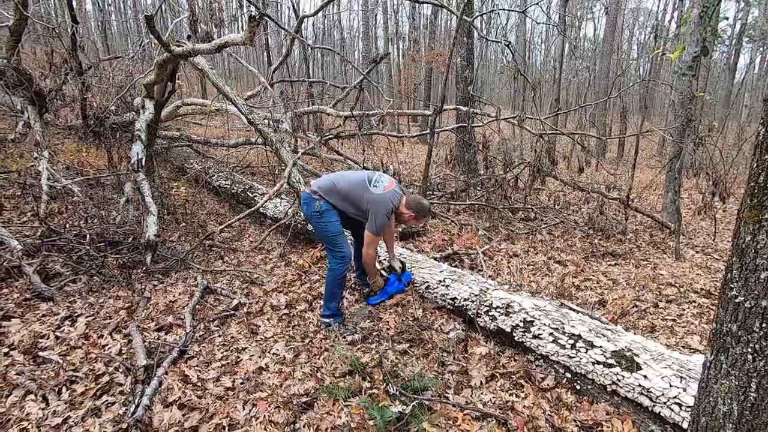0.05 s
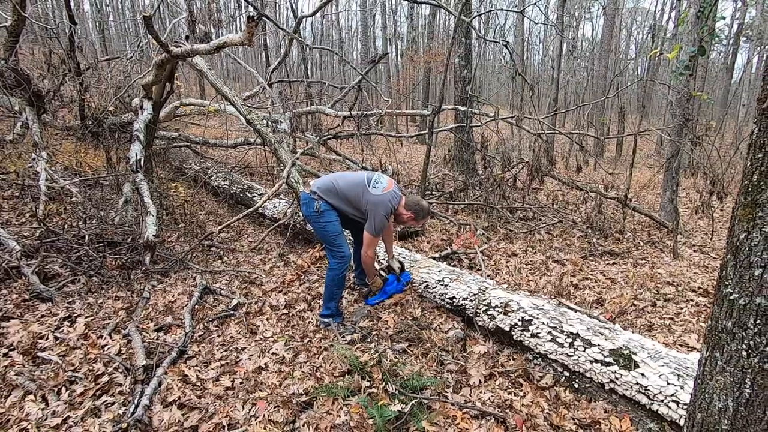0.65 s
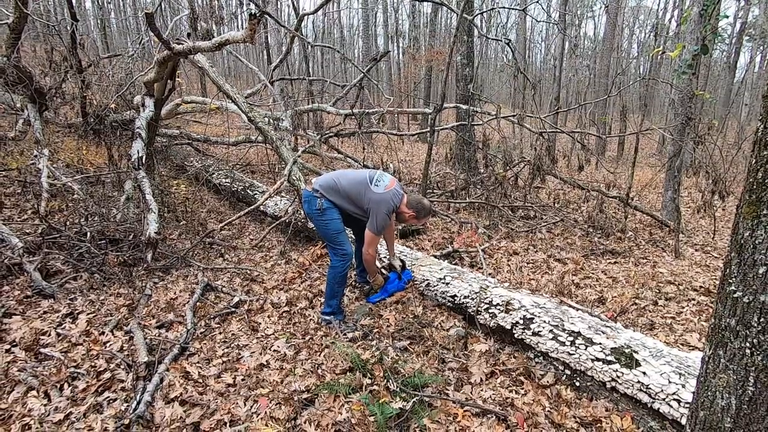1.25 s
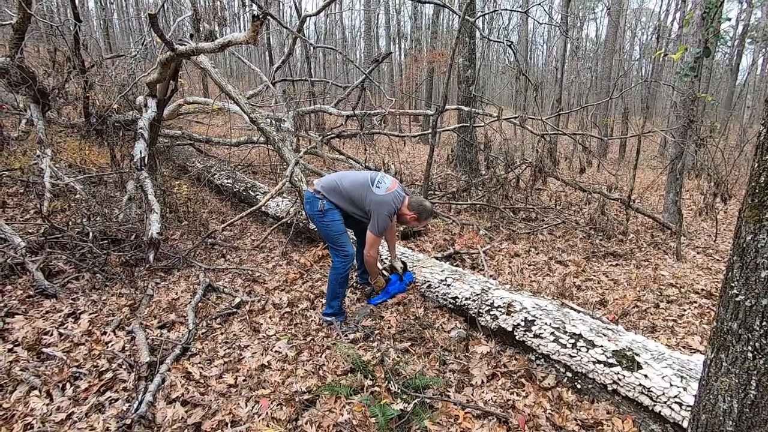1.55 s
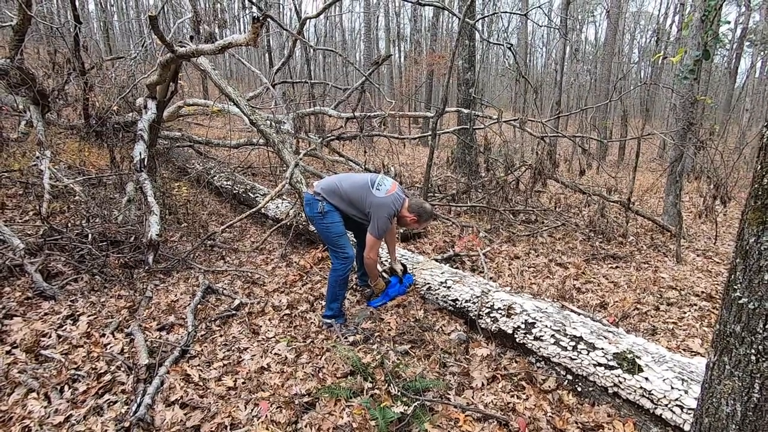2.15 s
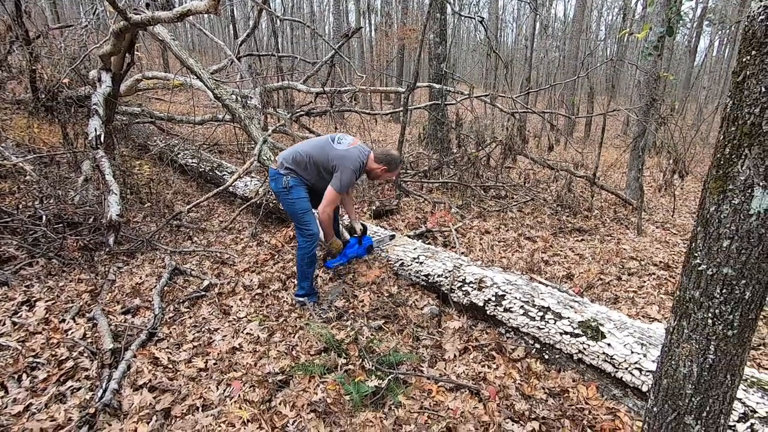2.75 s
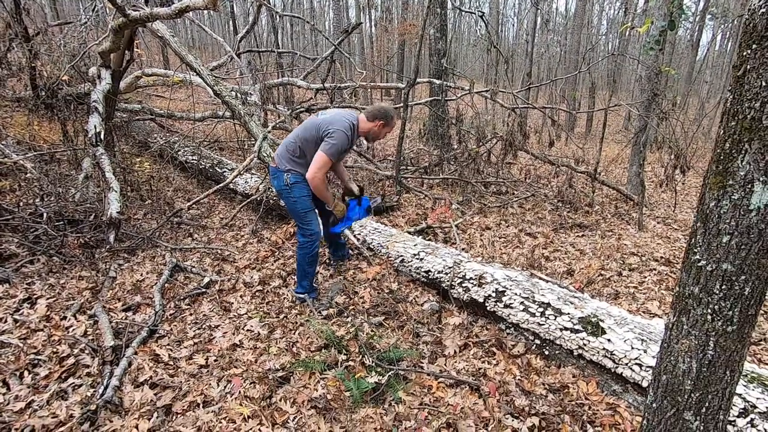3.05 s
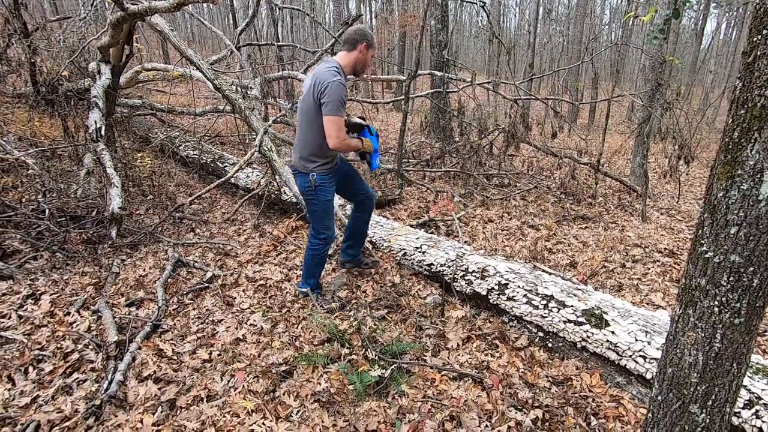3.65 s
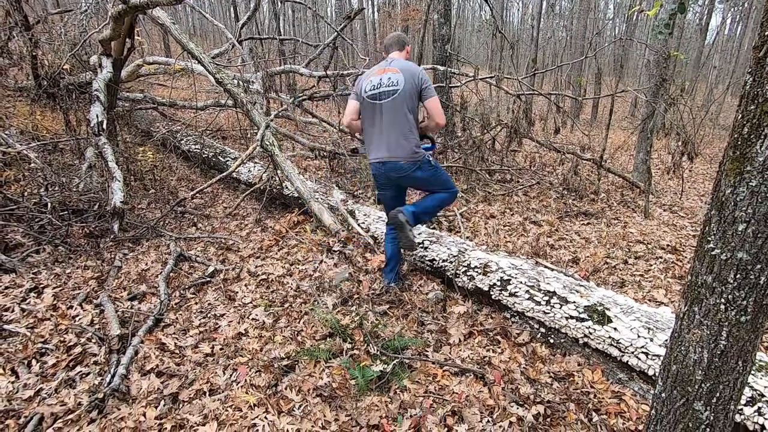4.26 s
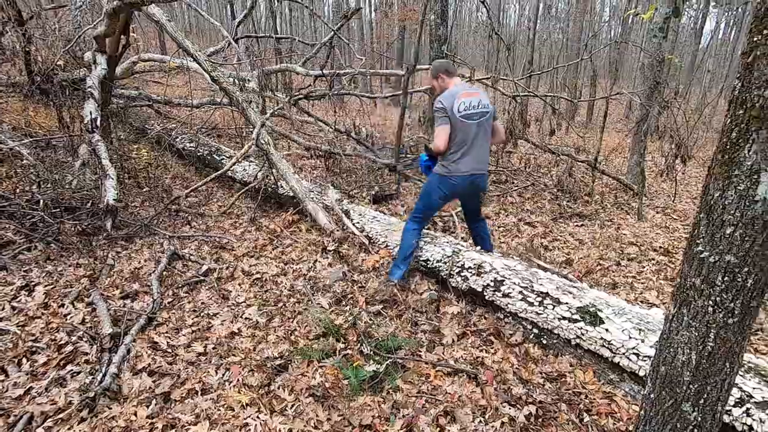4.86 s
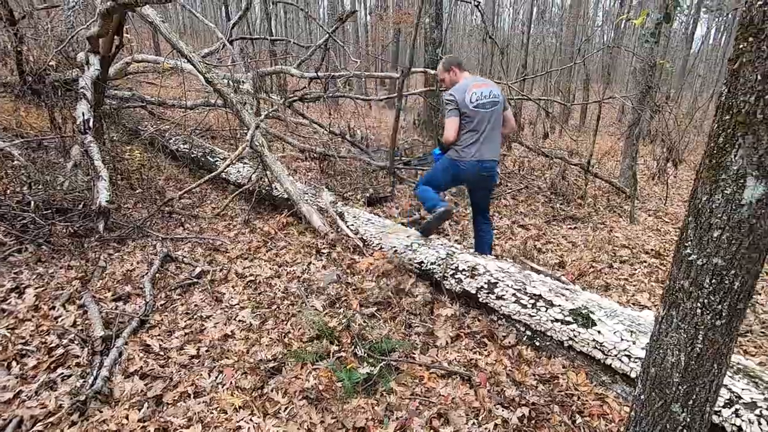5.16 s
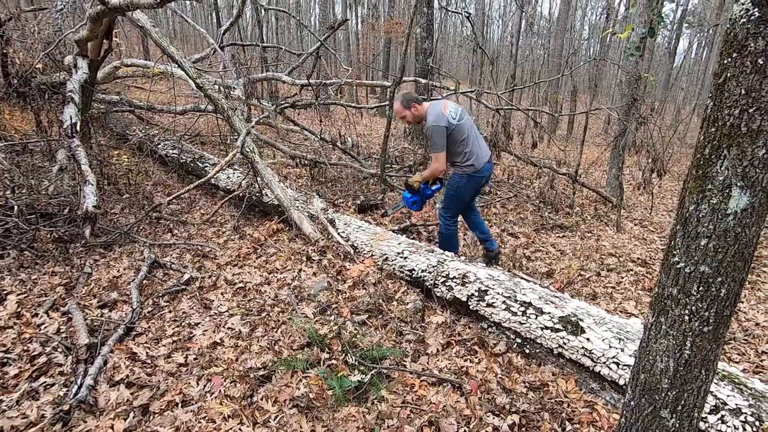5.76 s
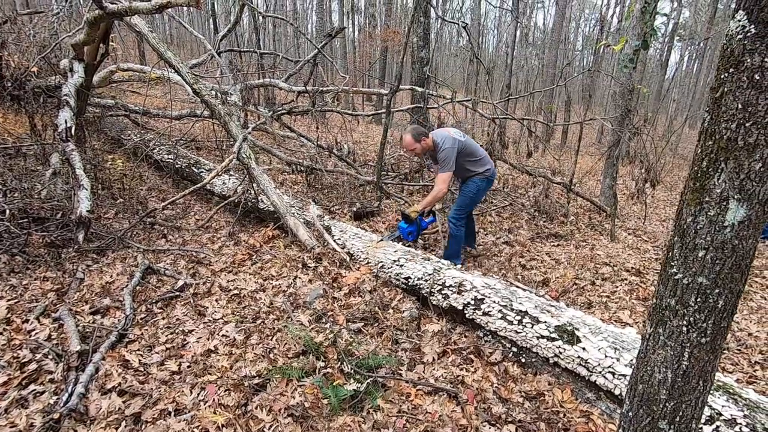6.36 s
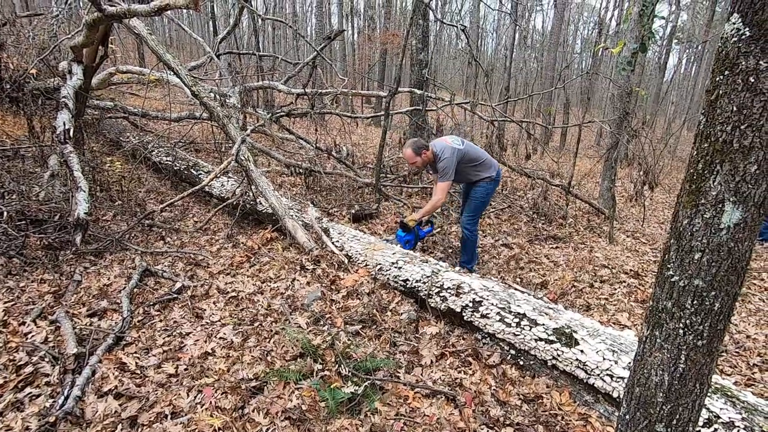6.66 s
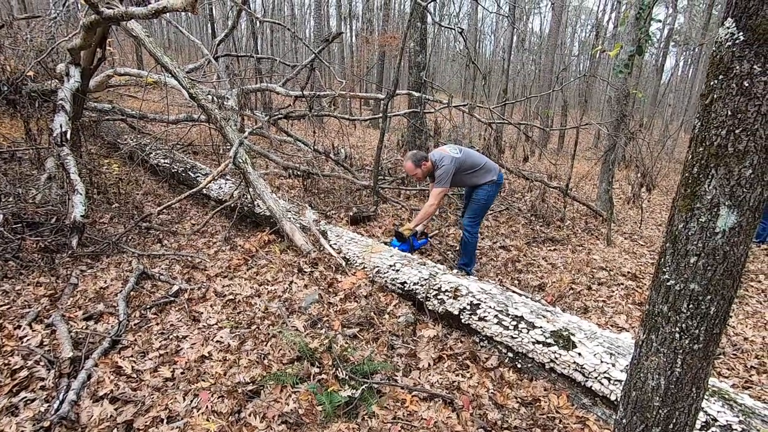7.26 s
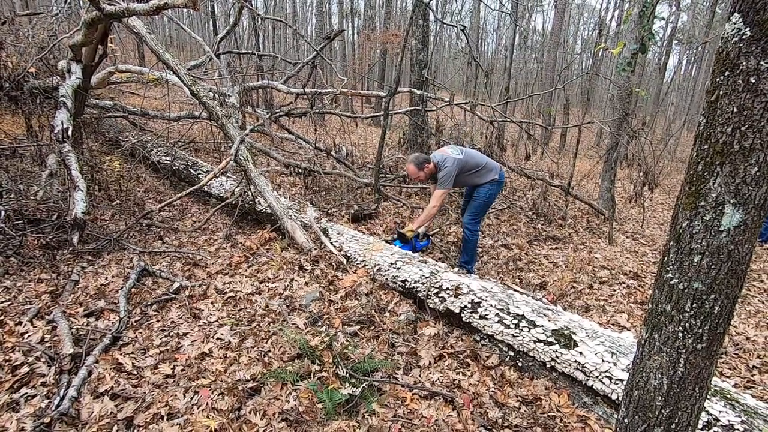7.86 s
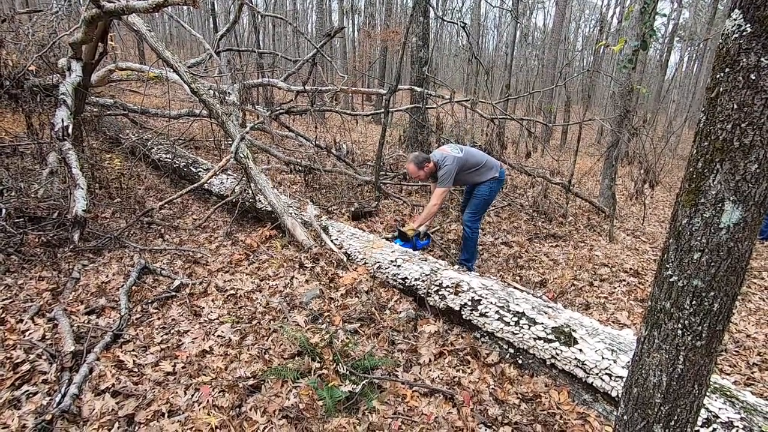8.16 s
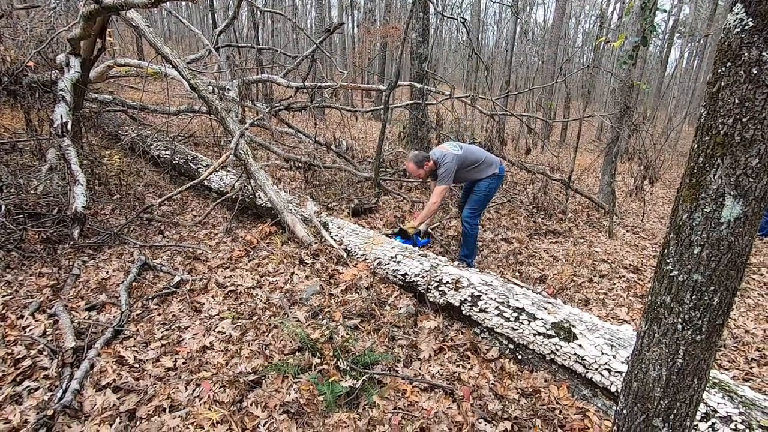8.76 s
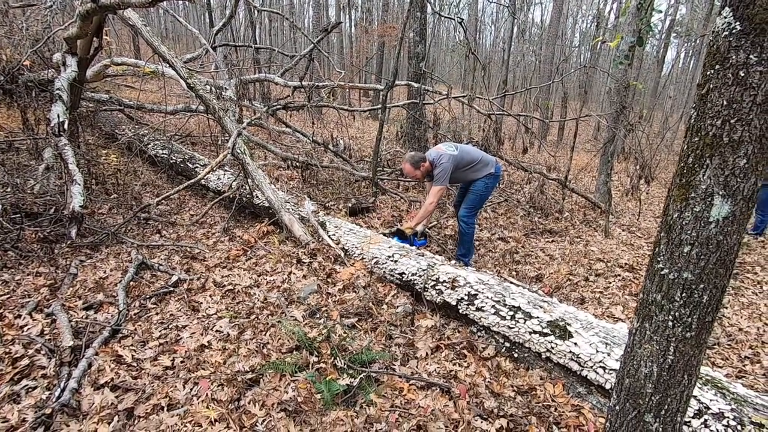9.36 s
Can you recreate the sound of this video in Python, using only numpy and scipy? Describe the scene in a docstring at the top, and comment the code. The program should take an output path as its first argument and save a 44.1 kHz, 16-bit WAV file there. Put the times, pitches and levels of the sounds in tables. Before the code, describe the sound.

A battery chainsaw bites into a fallen log a few metres away, its buzzing whine throbbing and wavering with the load. The chain races free, rattles and winds down. Footsteps crunch through dry leaves, with twigs snapping underfoot. Then the saw spins up again, skates on the bark and drops in pitch as it sinks into a steady second cut. The forest around is quiet, with only a faint short echo.

```python
"""Battery chainsaw in a winter wood.

A few metres away the chain throbs as it bites a fallen log, races free and stops. The sawyer steps over
the log through dry leaves and twigs, spins the saw up on the far side and leans it into the cut again.
Drive links rattle round the bar and sprocket; a cutter on every second link strikes the wood."""
import sys
import numpy as np
from scipy import signal
from scipy.fft import rfft, irfft, next_fast_len
from scipy.io import wavfile
from scipy.ndimage import uniform_filter1d

SR = 44100
rng = np.random.default_rng(int(sys.argv[2]) if len(sys.argv) > 2 else 0)


def dump(signal):
    """Clip the signal to [-1, 1] and save it as 16-bit WAV at the path in sys.argv[1]."""
    limited = np.clip(np.atleast_2d(signal).T, -1, 1)
    pcm = np.round(limited * 32767).astype(np.int16)
    wavfile.write(sys.argv[1], SR, pcm)


N = 414981
T = np.arange(N) / SR
RELEASE_S, TRIGGER_S = 2.62, 6.4  # trigger let go, pulled again
FREE_HZ = 622.7  # link rate with no drag

# Drag of the wood on the chain. Each row: time in seconds, drag (0 free, about 1 buried).
DRAG = [(0, 1.02), (1.1, 0.98), (2.458, .89), (2.48, 0.12), (2.54, 0.012), (6.95, 0.05), (7.31, 0.32),
        (7.42, 0.3), (7.71, 0.37), (7.79, 0.91), (7.95, 0.96), (8.78, 0.96), (8.9, 1.02), (9.03, 1.02),
        (9.16, 0.94), (9.35, 1.05)]


def chainsaw(bite_sag_per_db=.0015, sag_lag_s=.03):
    """Chain noise, sprocket whine and log drone, all following the chain speed."""
    # Cutters digging in. Each row: time in seconds, swell in dB, of which each layer takes a share.
    bites = [(0.062, 11), (0.249, 5.5), (.43, 9.5), (.51, 11), (0.609, 9), (.74, 11), (0.86, 10),
             (.953, 9.5), (1.043, 7.5), (1.129, 16), (1.245, 13.5), (1.396, 14.5), (1.48, 9), (1.575, 10.5),
             (1.72, 12), (1.945, 7.5), (2.17, 8.5), (2.345, 8)]
    # Saw level on each side of the log. Each row: time in seconds, gain in dB.
    near_level = [(0, -28), (2.41, -27.5), (2.74, -24.5), (2.84, -31.5), (2.94, -36.5), (2.975, -61)]
    far_level = [(6.39, -51), (6.44, -35.5), (6.49, -29), (6.619, -28.5), (6.69, -24), (7.35, -22.5),
                 (8.02, -26), (9.41, -27)]
    # Buried saw, near cut then far. Each row: link tone, cutter tone, log drone, in relative dB.
    cuts = [(-11, -18.5, -11), (-18, -32.5, -21.5)]
    link_hz, spin, load, graze = drive()
    t = T[::64]
    bite_db = np.interp(T, t, sum(db * np.exp(-.5 * ((t - s) / .026) ** 2) for s, db in bites))
    near_gain, far_gain = (undb(curve(side)) * during(side) for side in (near_level, far_level))
    link_db, cutter_db, drone_db = (np.where(T < TRIGGER_S, *pair) for pair in zip(*cuts))
    # each bite slows the chain a moment later
    sag = bite_sag_per_db * (np.interp(T - sag_lag_s, T, bite_db) - bite_db)
    links = np.cumsum(link_hz * (1 - sag + (.003 + .013 * load) * wander(45))) / SR
    phase = 2 * np.pi * links + (.7 - .25 * load + 3 * (1 - spin)) * wander(110)
    flutter_db = 2.3 * wander(45)
    link_db = -19.5 * (1 - load) + link_db * load - 2.5 * graze + flutter_db
    whine = sprocket_whine(links, phase, link_db, bite_db, graze) * undb(-24 * (1 - spin))
    drone = log_drone(links) * undb(-24 * (1 - load) + drone_db * load - 2 * (1 - spin))
    cutter_tone = np.sqrt(2) * np.sin(phase / 2 + .5 * wander(70))
    cutter_tone *= load * undb(cutter_db + .7 * bite_db + flutter_db)
    near_rattle, far_rattle = chain_rattle(links, load, graze, slack=1 - link_hz / FREE_HZ)
    near_chips, far_chips = wood_chips(links, load, bite_db)
    gears = gear_whine(links, graze) * (1 - load)
    rasp = chain_rasp(links) * (1 - load)
    near_buzz, far_buzz = cutter_buzz(links, load, bite_db)
    near = (near_rattle + near_chips + near_buzz + rasp) * undb(2.64 * load - .77)
    far = (far_rattle + far_chips + far_buzz + gears) * undb(-1)
    return near * near_gain + far * far_gain + (whine + drone + cutter_tone) * (near_gain + far_gain)


def drive(coast_s=.97, spin_up_s=.49, kick=.15, sag_hz=266, bark_drag=.38, buried_drag=.86):
    """The motor spins the chain, the wood slows it. Returns link rate, then spin, load, graze (0-1)."""
    drag = curve(DRAG)
    coasting = 1 - ramp(T, RELEASE_S, coast_s)
    starting = kick + (1 - kick) * ramp(T, TRIGGER_S, spin_up_s)
    spin = np.where(T < TRIGGER_S, coasting, starting)
    buried = ramp(drag, bark_drag, buried_drag - bark_drag)
    graze = ramp(drag, 0, .2) * (1 - buried)  # skating on bark
    return spin * (FREE_HZ - sag_hz * drag), spin, .94 * buried, graze


def wood_chips(links, load, bite_db):
    """Cutters chip the wood and ring the pinched guide bar. Returns near, far."""
    # Bar resonances. Each row: centre in Hz, width in Hz, gain in dB.
    near_bar = [(1190, 88, 1), (2950, 210, -13), (4770, 220, -3), (5740, 270, -1), (6520, 230, -5.5),
                (9300, 140, 2)]
    far_bar = [(2476, 43, -1.2), (4460, 99, 2)]
    # Buried spectra. Each row: frequency in Hz, relative level in dB.
    near_spectrum = [(290, -91), (500, -13), (914, 1.5), (1010, -5.5), (1600, -7.5), (1830, -6),
                     (2090, -0.5), (2400, -14), (2700, -6), (3380, -11.5), (4840, -14), (6090, -22.5),
                     (7800, -18), (8720, -33.5), (12100, -35.5), (15500, -53)]
    far_spectrum = [(290, -57), (500, -12), (737, -3), (803, -4.5), (1100, 3.5), (1310, -7.5), (1750, 5.5),
                    (2290, -6), (2500, -2.5), (4020, -6.5), (4440, -9.5), (5350, -12), (7130, -14.5),
                    (12900, -42.5), (15500, -48)]
    chips = impacts(links / 2, scatter_db=1, jitter_turns=.04, grit=2.9, fade_turns=2.8)
    chips *= np.sqrt(load) * undb(.48 * wander(24))
    # a deep bite swells the woody middle; the steel hiss stays even
    biting = chips + (undb(.5 * bite_db - 2) - 1) * ring(chips, 790, 680)
    near = biting + sum(undb(db) * ring(biting, hz, width) for hz, width, db in near_bar)
    far = chips + sum(undb(db) * ring(chips, hz, width) for hz, width, db in far_bar)
    return voiced(near, near_spectrum), voiced(far, far_spectrum)


def cutter_buzz(links, load, bite_db):
    """Harmonics of the cutters striking the wood. Returns near, far."""
    # Each row: multiple of the cutter rate, relative level in dB.
    near_orders = [(3, -24.5), (5, -14), (10, -12.5), (14, -20.5)]
    far_orders = [(4, -15), (6, -14.5)]
    near = wavering(links / 2, near_orders) * undb(.61 * bite_db - 1.5)
    return load * near, load * wavering(links / 2, far_orders)


def chain_rattle(links, load, graze, slack):
    """Free links rattle; a slowing chain slaps the bar; bark damps the hiss. Returns near, far."""
    # Free-running spectra. Each row: frequency in Hz, relative level in dB.
    near_spectrum = [(290, -16), (500, -20), (803, -2.5), (1130, -6), (1310, -10.5), (1820, -3),
                     (2090, -4.5), (2290, -6.5), (3300, -9), (4800, -11.5), (5900, -17.5), (6400, -15),
                     (7000, -16.5), (12100, -31), (15500, -44)]
    far_spectrum = [(290, -52), (340, -9.5), (520, -18), (790, -4), (1100, -2), (1290, -11), (1500, -3.5),
                    (1820, .5), (2240, -8.5), (2650, -4.5), (3700, -5.5), (4050, -10), (5400, -12.5),
                    (7130, -12), (8600, -19.5), (12300, -30), (15500, -45)]
    rattle = impacts(links, scatter_db=1.5, jitter_turns=.08, grit=2.2) * np.sqrt(1 - load)
    slap = undb(6.5) * slack * (1 - load) * (ring(rattle, 800, 160) + ring(rattle, 1760, 220))
    damped = rattle - .56 * graze * ring(rattle, 9990, 12000)
    return voiced(rattle + slap, near_spectrum), voiced(damped, far_spectrum)


def chain_rasp(links):
    """The chain whips out of the cut: bands of scraping that slide with its speed."""
    # Each row: multiple of the link rate, relative level in dB.
    bands = [(6.251, -9), (7.4, -9.5)]
    rasp = np.zeros(N)
    for order, db in bands:
        phase = 2 * np.pi * order * links
        rasp += undb(db) * (wander(520) * np.sin(phase) + wander(520) * np.cos(phase))
    return rasp


def sprocket_whine(links, phase, link_db, bite_db, graze):
    """Link tone and its octave, which rings the casing while the chain skates on bark."""
    tone = undb(link_db + .61 * bite_db) * np.sin(phase)
    octave = undb(2.4 * wander(30)) * np.sin(4 * np.pi * links + .95 * wander(110))
    casing = undb(-8) * graze * ring(octave, 1095, 75)
    return np.sqrt(2) * (tone + undb(-24.5 + .5 * bite_db) * octave + casing)


def log_drone(links):
    """Cutter blows shake the log."""
    # Each row: frequency in Hz, relative level in dB.
    spectrum = [(90, -9), (125, -6), (170, 4.5), (240, 5), (440, 3.5), (560, -16), (800, -31)]
    return unit(colour(impacts(links / 2, scatter_db=2, jitter_turns=.14, grit=5.8), spectrum))


def gear_whine(links, graze, housing_hz=3600, width_hz=730):
    """Gear tones and a high motor order sing as they sweep through housing resonances."""
    # Each row: multiple of the link rate, relative level in dB.
    orders = [(5.85, -17), (6.18, -12.5), (6.7, -11.5)]
    gears = ring(ring(wavering(links, orders), housing_hz, width_hz), housing_hz, width_hz)
    whistle = ring(np.sin(2 * np.pi * 20.4 * links + wander(300)), 11940, 450)
    return undb(5.5 - 6 * graze) * gears + undb(-26) * whistle


def footsteps(cracks_per_s=4000, lone_per_s=70, lone_decay_s=.0013, attack_s=.043, release_s=.065):
    """Dry leaves slide and break in dense tiny cracks under each tread, and stir in between."""
    # Treads and scuffs. Each row: start in seconds, length in seconds, relative level in dB.
    steps = [(3.405, 0.018, -41), (3.539, 0.05, -45), (3.747, .012, -40.5), (3.89, 0.19, -33.5),
             (4.502, 0.034, -42), (4.628, 0.016, -36.5), (4.795, 0.061, -35), (4.978, 0.054, -36.5),
             (5.074, 0.046, -34.5), (5.22, 0.086, -43.5), (5.555, 0.067, -39), (5.83, 0.2, -45),
             (6.063, 0.01, -43.5), (6.179, 0.086, -36)]
    # Each row: frequency in Hz, relative level in dB.
    leaf_spectrum = [(59, -51), (105, -23), (175, -1), (520, -13), (825, -1.5), (1520, -3.5), (1960, 2),
                     (2330, -2.5), (2600, 3.5), (3150, 2), (3750, 3.5), (4900, -1), (5300, -1),
                     (6700, -0.5), (7600, -3.5), (8600, -11), (9400, -12), (13100, -25), (15500, -35)]
    cracks = (rng.random(N) < cracks_per_s / SR) * noise()
    cracks *= undb(4.1 * np.minimum(rng.exponential(size=N), 4))
    rustle = unit(colour(smear(unit(cracks), spread_s=.00102) + 1.3 * noise(), leaf_spectrum))
    # single brittle leaves break louder than the rest
    lone = (rng.random(N) < lone_per_s / SR) * undb(-3 + np.clip(noise(), -2, 2))
    rustle *= .84 + signal.lfilter([1], [1, -np.exp(-1 / (lone_decay_s * SR))], lone)
    power = stir = undb(-49) ** 2 * ramp(T, 2.95, .64)
    for start_s, length_s, db in steps:
        fade = np.maximum(start_s - T, 0) / attack_s + np.maximum(T - start_s - length_s, 0) / release_s
        power = power + undb(db) ** 2 * np.exp(-2 * np.minimum(fade, 20))
    body = ring(rustle, 540, 220)  # light stirring lacks it
    return (rustle * np.sqrt(power) - body * np.sqrt(stir)) * undb(1.5 * wander(60))


def wood_snaps(splinter_s=.032, splinter_db=-17, thump_s=.014):
    """Each snap: a sharp crack in a broad wood resonance, brief splintering, a dull thump."""
    # Wood cracking in the cut, twigs underfoot, the chain jerking and touching bark. Each row: start in
    # seconds, crack in relative dB, ring in Hz, thump in relative dB, crack decay in seconds.
    snaps = [(1.975, -19, 2400, -45, 0.0016), (2.355, -27, 1999, -35, 0.0018),
             (2.778, -13, 3550, -53, 0.0026), (3.211, -32.5, 4460, -74, .003),
             (3.256, -31.5, 3350, -75, 0.012), (3.736, -22.5, 4300, -69, 0.0064),
             (3.756, -28.5, 3600, -58, 0.0054), (3.781, -29, 2900, -66, .003),
             (4.065, -26, 3400, -49, 0.0011), (4.123, -24, 3500, -44, 0.0087),
             (4.62, -20.5, 4230, -43.5, 0.004), (4.787, -28, 3280, -38, 0.0022),
             (4.844, -16.5, 2770, -25, 0.0035), (4.865, -17, 3200, -41, .003),
             (5.596, -27, 3500, -39, 0.0026), (5.671, -16.5, 3350, -38, 0.003),
             (5.823, -27, 2850, -38.5, 0.0034), (5.872, -26, 910, -52, 0.0032),
             (5.906, -22.5, 3380, -42, 0.0022), (6.066, -23, 3950, -50, 0.0027),
             (6.146, -21, 3800, -56, 0.0085), (6.244, -24.5, 4530, -56, 0.0045),
             (6.416, -27, 2570, -54, .003), (6.676, -14, 953, -52, 0.0055)]
    out, t = np.zeros(N), T[:4096]
    for start_s, crack_db, hz, thump_db, crack_s in snaps:
        burst, push = rng.standard_normal((2, len(t)))
        burst *= np.exp(-t / crack_s) + undb(splinter_db) * np.exp(-t / splinter_s)
        crack = ring(burst, hz, .77 * hz) + .69 * ring(burst, 1110, 370) + .061 * ring(burst, 2 * hz, hz)
        crack *= undb(crack_db + 1.5) / np.abs(crack).max()
        thump = ring(ring(push * np.exp(-t / thump_s), 190, 250), 325, 510)
        thump *= undb(thump_db + 3) / np.abs(thump).max()
        start = int(start_s * SR)
        out[start:start + len(t)] += crack + thump
    outline = [(90, -5.5), (4500, .5), (5400, -7), (7500, -.5), (8600, -13), (9500, -13), (15500, -22)]
    return colour(out, outline)


def air_and_rumble(air_db=-62.5, swell_at_s=8.3, swell_rise_s=.22, swell_db=10.5):
    """Faint air among the trees; a low rumble rises with chain drag and swells late in the far cut."""
    # Each row: frequency in Hz, relative level in dB.
    air_spectrum = [(15, -44), (25, -18), (67, -10), (98, -46), (500, -37), (3350, -17), (7480, -24),
                    (15000, -45)]
    rumble = unit(colour(noise(), [(48, -10), (66, -2), (85, -12), (120, -.5), (170, -2)]))
    rumble_db = -79.5 + 18.5 * curve(DRAG) + swell_db * ramp(T, swell_at_s, swell_rise_s)
    air = unit(colour(noise(), air_spectrum))
    return air * undb(air_db) + rumble * undb(rumble_db + 4 * wander(22))


def forest(x, t60_s=.77, echo_db=-19, quadrature_db=-15):
    """Trunks and leaf litter return a faint short echo, widest in the treble. Returns stereo."""
    # Each row: frequency in Hz, side minus mid in dB.
    width = [(60, -1), (200, -24), (1000, -11), (4000, -15.5), (8000, -2), (13000, -2)]
    # Each row: time in seconds, left minus right in dB.
    pan = [(0, -1), (3, 0.1), (6, -1.5), (9.41, -1)]
    # Each row: frequency in Hz, left minus right in dB.
    tilt = [(20, 1), (1100, -1.5), (2300, 2), (4500, 0.9), (16000, 1.5)]
    t = T[:SR // 2]
    tails = rng.standard_normal((2, len(t))) * 1000 ** (-t / np.array([[t60_s], [t60_s / 4]]))
    echo, scatter = (signal.fftconvolve(x, tail / np.linalg.norm(tail))[:N] for tail in tails)
    quadrature = signal.hilbert(x, next_fast_len(N))[:N].imag  # shifts phase between left and right
    side = colour(scatter, width) + undb(quadrature_db) * ring(quadrature, 1070, 2300)
    ears = []
    for sign in (1, -1):
        ear = (x + undb(echo_db) * echo + sign * side) * undb(sign * curve(pan) / 2)
        ears.append(colour(ear, [(hz, sign * db / 2) for hz, db in tilt]))
    return np.array(ears)


def impacts(turns, scatter_db, jitter_turns, grit, fade_turns=.95):
    """One blow per turn, each with its own force and delay: a click, then a fading scrape."""
    timing, strength = rng.standard_normal((8192, 2)).T
    turns = turns + jitter_turns * np.interp(turns, np.arange(len(timing)), timing) + 1
    index = np.floor(turns).astype(int)
    force = undb(scatter_db * strength[index])
    click = np.diff(index, prepend=index[0]) * force
    scrape = np.exp(-(turns % 1) / fade_turns) * force * noise()
    return smear(unit(unit(click) + grit * unit(scrape)), spread_s=.002214)


def wavering(turns, orders):
    """Sum of (multiple, dB) tones, each trembling in level and phase."""
    tones = np.zeros(N)
    for order, db in orders:
        gain = undb(db + 2 * wander(120) + 1.3 * wander(14))
        tones += gain * np.sin(2 * np.pi * order * turns + .6 * wander(150))
    return tones


def smear(x, spread_s):
    """Give each frequency its own short delay."""
    size = next_fast_len(N + 8192)
    hz = np.fft.rfftfreq(size, 1 / SR)
    delay_s = spread_s * np.interp(hz, np.linspace(0, SR / 2, 64), rng.random(64))
    return irfft(rfft(x, size) * np.exp(-2j * np.pi * np.cumsum(delay_s) * hz[1]), size)[:N]


def colour(x, points):
    """Filter by a (Hz, dB) outline, falling 20 dB per octave beyond its ends."""
    hz, db = np.transpose(points)
    size = next_fast_len(N + 8192)
    octave, knots = np.log2(np.fft.rfftfreq(size, 1 / SR) + 1), np.log2(hz)
    beyond = np.abs(octave - np.clip(octave, knots[0], knots[-1]))
    return irfft(rfft(x, size) * undb(np.interp(octave, knots, db) - 20 * beyond), size)[:N]


def voiced(x, points):
    """Colour a white signal, keeping its power."""
    hz, db = np.transpose(points)
    log_hz = np.log(np.linspace(1, SR / 2, 2048))
    gain = undb(np.interp(log_hz, np.log(hz), db, left=-99, right=-99))
    return colour(x, points) / np.sqrt(np.mean(gain ** 2))


def ring(x, hz, width_hz):
    """One resonance, gain 1 at its centre."""
    return signal.lfilter(*signal.iirpeak(hz, hz / min(width_hz, SR / 4), fs=SR), x)


def noise():
    """White noise."""
    return rng.standard_normal(N)


def wander(rate_hz):
    """Random drift, rms 1."""
    knots = rng.standard_normal(8192)
    return unit(np.interp(T * rate_hz, np.arange(len(knots)), knots))


def curve(table):
    """Join (seconds, value) rows by straight lines."""
    return np.interp(T, *np.transpose(table))


def during(table):
    """1 over the time a table spans, with soft edges."""
    return uniform_filter1d(1. * ((T >= table[0][0]) & (T <= table[-1][0])), size=600)


def ramp(x, start, length):
    """0 up to start, rising to 1 over length."""
    return np.clip((x - start) / length, 0, 1)


def undb(db):
    """Decibels to gain."""
    return 10 ** (np.asarray(db) / 20)


def unit(x):
    """Scale to rms 1."""
    return x / np.sqrt(np.mean(x ** 2) + 1e-20)


def scene():
    """Saw, steps and snapping wood among the trees."""
    return forest(chainsaw() + footsteps() + wood_snaps() + air_and_rumble())


def record(dry):
    """Hollow the treble in places and cut the top."""
    # Each row: centre in Hz, width in Hz, depth from 0 to 1.
    notches = [(5340, 260, 0.38), (5920, 200, 0.27), (8470, 480, 0.48)]
    top_hz = 15450
    for hz, width_hz, depth in notches:
        dry = dry - depth * ring(dry, hz, width_hz)
    return signal.sosfilt(signal.ellip(10, .2, 80, top_hz, fs=SR, output="sos"), dry)


dry = scene()
out = record(dry)
dump(out)
```